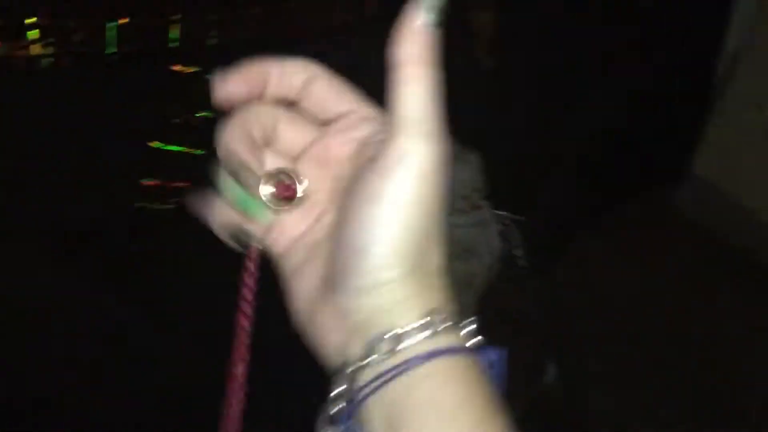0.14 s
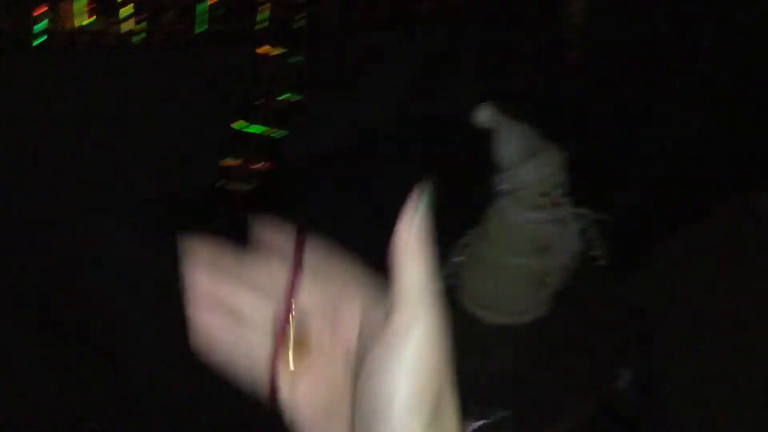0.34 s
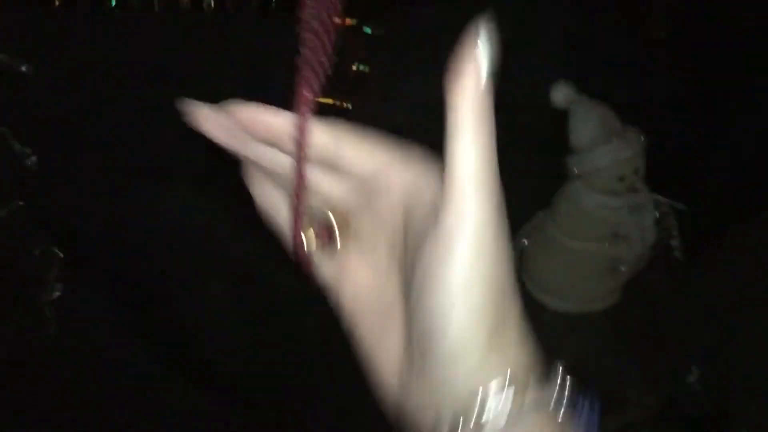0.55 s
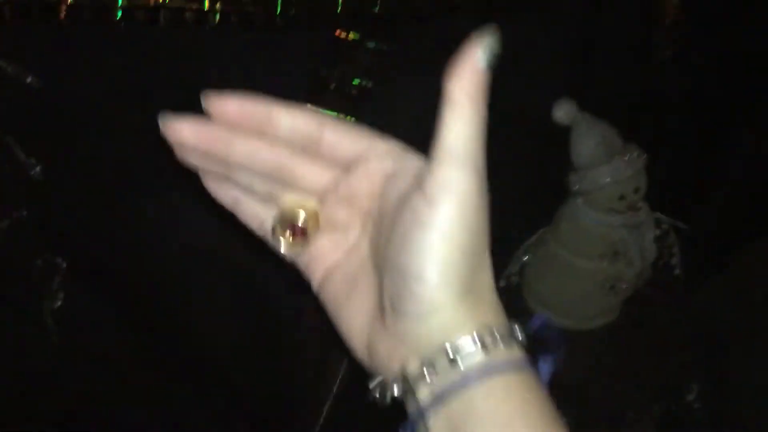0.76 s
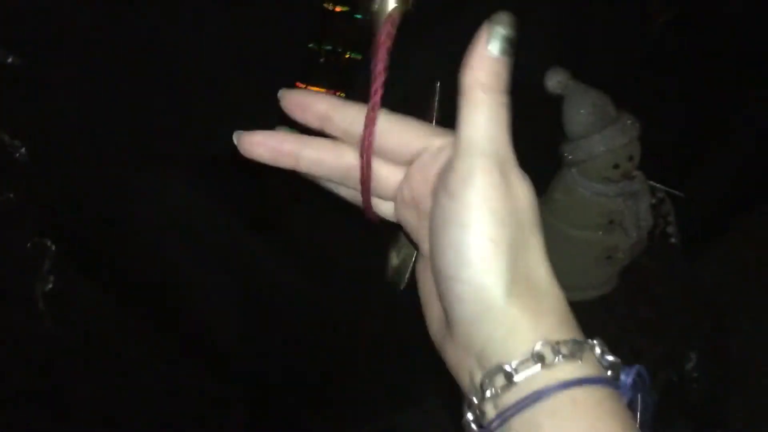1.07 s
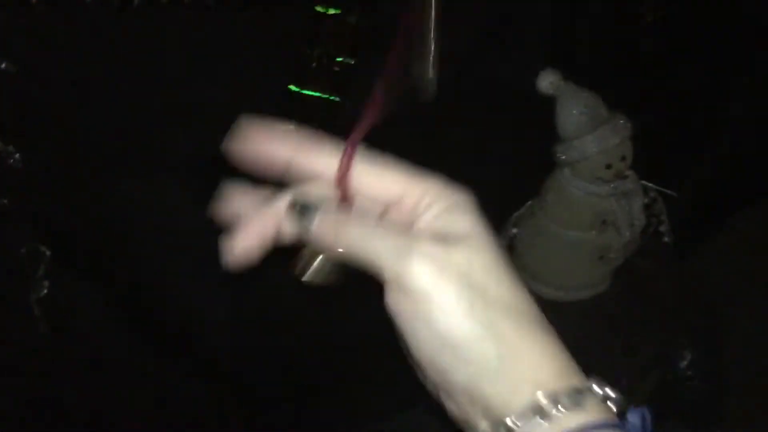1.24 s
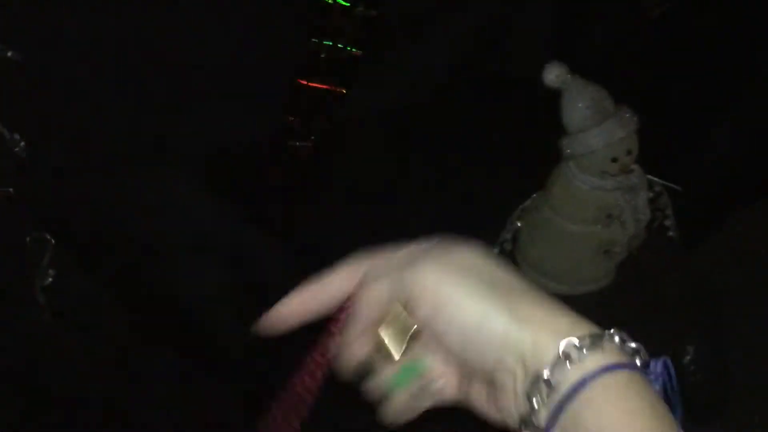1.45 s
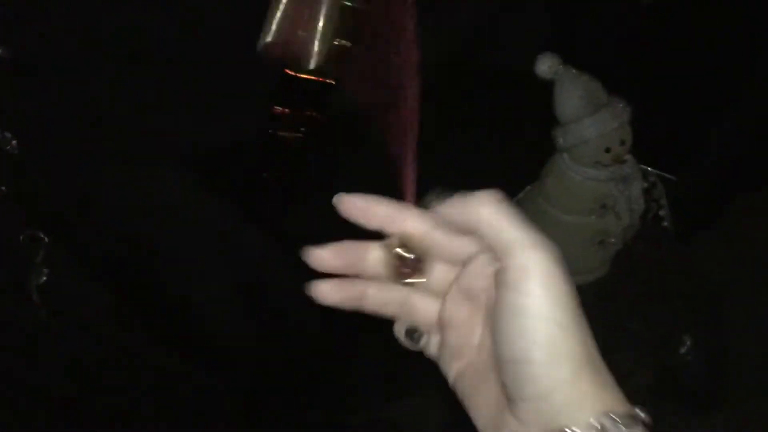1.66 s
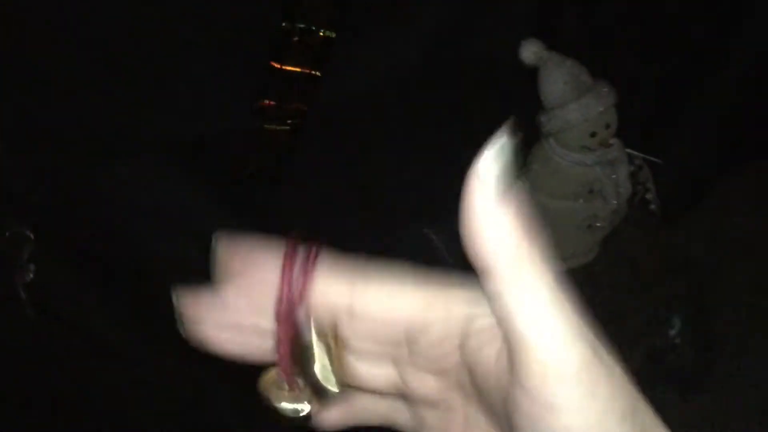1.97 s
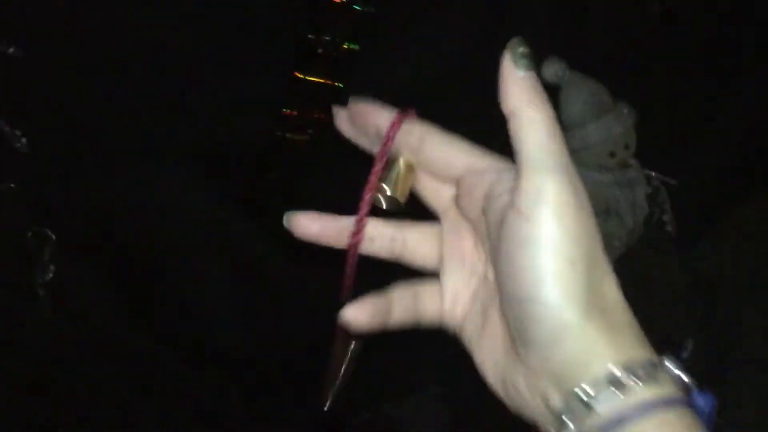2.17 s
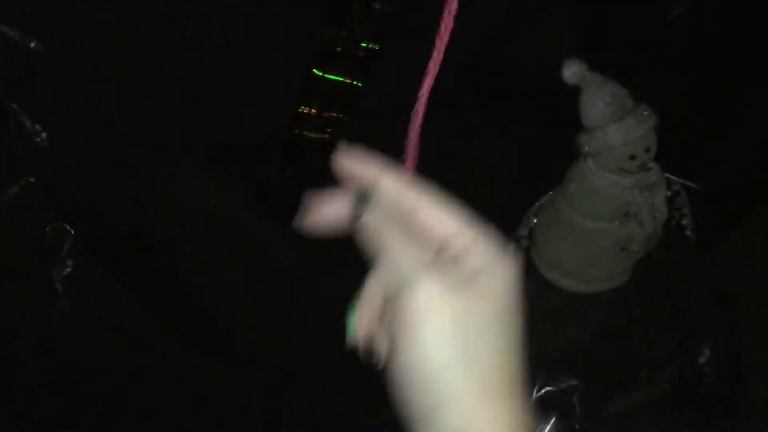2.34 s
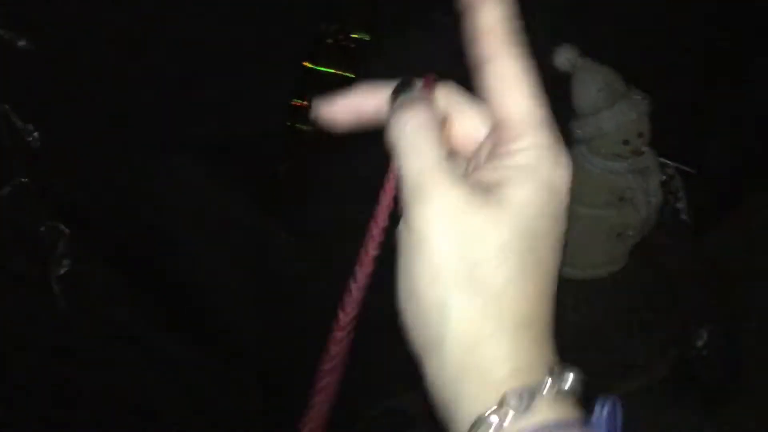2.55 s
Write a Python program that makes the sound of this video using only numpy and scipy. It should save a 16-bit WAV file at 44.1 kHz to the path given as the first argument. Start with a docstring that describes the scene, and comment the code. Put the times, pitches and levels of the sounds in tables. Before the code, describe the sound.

Small hard beads on a cord, flipped around a ringed hand, click in short uneven clusters, with one strong clack near one second and faint cord rustle; close microphone, small room, steady low fan.

```python
"""A small room, close to the microphone: small hard beads on a cord are flipped around a hand.
They click against each other and clack on finger rings in short clusters, each contact a few fast-dying modes.
Between flips the cord slides over the skin as swells of grainy filtered noise.
Beads, rings and cord get random-echo reverb; a fan rushes (shaped noise) and hums (sines) behind."""
import sys
import numpy as np
from scipy import signal
from scipy.fft import rfft, irfft
from scipy.io import wavfile
from scipy.ndimage import uniform_filter1d

SR = 44100
rng = np.random.default_rng(int(sys.argv[2]) if len(sys.argv) > 2 else 0)


def pcm_store(signal):
    """Save signal as 16-bit PCM."""
    levels = np.round(np.clip(np.atleast_2d(signal), -1, 1) * 32767)
    wavfile.write(sys.argv[1], SR, levels.astype(np.int16).T)


N = 119511
T = np.arange(N) / SR  # time axis, s

# Bead contacts, balanced around the body of the click:
# start_s, strength_db (relative), high_ring_db (against body), low_knock_db (against body)
BEAD_CONTACTS = [ (0.1443, -19, -3, -5), (0.1534, -16.5, 2, -7), (0.1582, -7, -10, -33),
                 (.1623, -25, -9, 0), (0.2672, -14.5, 7.5, -9.5), (0.2833, -24.5, 5, 6.5),
                 (.3126, -19, 7, -2), (.3162, -26, 2, -1), (.3175, -27, 6, 1), (.3227, -28, 3, -2),
                 (.3243, -19, 13, -3), (.3290, -25, 4, -3), (.5388, -13, 11, -7), (.5467, -24, 5, -1),
                 (.5547, -21, 9, -3), (.6071, -35, -14, 0), (.7123, -28, 9, 4), (.7223, -21, 11, 4),
                 (.7252, -19, 13, 3), (.7317, -21, 8, 0), (.7375, -25, 8, 0), (.7459, -30, 1, 0),
                 (0.964, -30, 14, 8), (.9814, -35, 15, 8), (1.3118, -25, 6, 2), (1.3299, -28, -1, 4),
                 (1.3336, -18, 0, 1.5), (1.7674, -33, 2, 2), (1.7793, -11, 11, 3), (1.7831, -27, 9, 1),
                 (1.7865, -31, 6, 2), (1.9691, -41, -7, -15), (2.0075, -31, 8, 0), (2.0145, -17.5, 5, -6),
                 (2.0390, -18.5, -21, -9.5), (2.0548, -27.5, 10.5, -13), (2.2160, -16.5, 2, -12),
                 (2.2267, -25, -18, -10), (2.6498, -2, -5.5, -9.5), (2.6562, -29, 8, 14),
                 (2.6709, -21.5, -6, 4.5), (2.6861, -35, -2, -1), (2.6958, -26.5, 13, 2)]
# Modes a bead rings with: pitch_hz, level_db (relative), t60_s
BEAD_MODES = np.array([(5330, -25, 0.0044), (6730, -5.5, 0.00089), (9230, 1.0, 0.002), (11400, 3, 0.0023),
              (12900, -1.5, 0.0012), (15330, 5.5, 0.0024)])
KNOCK_HZ, BODY_HZ, RING_HZ = 6780, 10500, 13100  # centres of low knock, body and high ring
MODE_SPREAD = 0.0079  # random detuning, share of pitch
BEAD_DB, BEAD_LOW_HZ = -3.5, 4700  # trim and low cut
HAND_ECHO_S, HAND_ECHO_DB = 0.0007, -16  # mean lag, level against the first touch
CHATTER_S, CHATTER_DB = 0.004, -21  # time scale, starting level against the first touch

# Heavier knocks of a bead on a finger ring: start_s, strength_db (relative)
RING_KNOCKS = [(0.9507, -0.5), (0.9598, -24)]
# Modes the finger ring sounds with: pitch_hz, level_db (relative)
RING_MODES = np.array([(3400, -20), (6700, -16), (11000, -5), (14100, -1.5), (16100, -4)])
RING_T60_S, RING_LOW_HZ = 0.0025, 2640  # decay and low cut

# Cord sliding over the hand: middle_s, half_length_s (to 1/e), level_db (rms at the middle, before
# the cuts), centre_hz
CORD_SLIDES = [(0.044, 0.045, -66, 13800), (0.117, 0.023, -57, 11700), (0.16, .1, -77, 4500),
               (0.205, .025, -71, 13000), (0.212, .02, -78, 5800), (0.6, 0.028, -69, 10800),
               (1.053, 0.053, -81, 9470), (1.06, 0.051, -75.5, 13800), (1.17, .02, -80.5, 11300),
               (1.53, .1, -85, 12500), (1.502, 0.024, -72, 13300), (1.5, 0.018, -81, 6640),
               (1.549, .01, -70, 6040), (1.555, 0.0073, -60, 10200), (1.596, 0.013, -75, 13700),
               (1.672, 0.019, -75, 14800), (1.875, 0.037, -84, 12900), (1.969, 0.0095, -70, 13500),
               (2.001, 0.015, -62, 12800), (2.045, 0.049, -83, 6200), (2.39, 0.1, -84, 4600),
               (2.67, .03, -64, 12200)]
SLIDE_WIDTH = 0.32  # bandwidth, share of the centre frequency
SLIDE_LOW_HZ = 4270  # low cut
SLIDE_GRAIN_DB, SLIDE_CATCH_DB = 2.8, 2  # spread of the fast grain and of the slower catching
SOFT_TOP_HZ = 15700  # high cut of the cord slides and the echoes

# Scattered echoes from hand and nearby things, then a short tail (levels before the body boost)
EARLY_DB, EARLY_T60_S, EARLY_GAP_S, EARLY_GRAIN_DB = -15, 0.035, 0.0016, 8
TAIL_DB, TAIL_T60_S, TAIL_GAP_S = -17.5, 0.19, 0.004
# The room returns the lower part of a click more strongly: a lowpassed copy is added
ROOM_BODY_DB, ROOM_BODY_HZ = -1, 6000

# Spectrum of the fan's rush: pitch_hz, density_db (per Hz, relative)
FAN_RUSH = [(25, -32.5), (55, -43), (85, -19), (110, -4.5), (150, 1), (205, -0.5), (275, 5.5), (340, -2),
            (520, -2), (700, -5.5), (860, -11), (1100, -16.5), (1300, -17.5), (1950, -18.5), (2500, -22.5),
            (3100, -32), (3800, -40), (4400, -52), (5400, -60.5), (8000, -61)]
# Top end of the same spectrum: pitch_hz, density_db (per Hz, relative)
FAN_TOP = [(16000, -73)]
# Narrow resonances of fan housing and room: pitch_hz, half_width_hz (to -6 dB), level_db (rms)
FAN_RESONANCES = [(236.6, 6.8, -55), (266.2, 26, -48), (478.5, 11, -63.5), (518, 19, -60.5),
                  (572, 6.7, -59.5), (679, 28, -54), (770, 23, -60), (1029.5, 14, -62), (1123, 37, -63)]
# Steady tones of the fan: pitch_hz, level_db (rms, before the waver)
FAN_HUM = [(120.1, -45.5), (152, -54.5), (1674, -74)]
FAN_DB, HUM_WAVER_DB = -42, 1.33  # rms of the rush, spread of the hum's level
FAN_HISS_HZ, FAN_DRIFT_DB = 2740, 1.9  # hiss above this drifts in level by this spread
TOP_HZ = 16500  # overall high cut


def beads():
    """Each contact rings the bead's modes, balanced by where it is hit; a near echo off the hand and faint
    chatter follow."""
    out = np.zeros(N)
    mode_hz, mode_db, t60 = BEAD_MODES.T
    sign = (-1) ** np.arange(len(mode_hz))  # neighbouring modes start in opposite directions
    for start, strength_db, ring_db, knock_db in BEAD_CONTACTS:
        balance_db = np.interp(mode_hz, [KNOCK_HZ, BODY_HZ, RING_HZ], [knock_db, 0, ring_db])
        gain = sign * amp(BEAD_DB + strength_db + mode_db + balance_db)
        # a near echo off the hand follows at once, then the bead chatters faintly on the cord
        touches = [(0, 0), (HAND_ECHO_S * (0.5 + rng.random()), HAND_ECHO_DB)]
        for lag in np.cumsum(rng.random(size=5)):
            touches.append((CHATTER_S * lag, CHATTER_DB - 2 * lag))
        for lag_s, touch_db in touches:
            detune = 1 + MODE_SPREAD * rng.standard_normal(len(mode_hz))
            click = strike(mode_hz * detune, gain * amp(touch_db), t60)
            add(out, start + lag_s, click)
    return highpass(out, BEAD_LOW_HZ)


def finger_ring():
    """A bead lands on a ring: a lower, hollower clack from the ring's own modes."""
    out = np.zeros(N)
    mode_hz, mode_db = RING_MODES.T
    for start, strength_db in RING_KNOCKS:
        add(out, start, strike(mode_hz, amp(strength_db + mode_db), RING_T60_S))
    return highpass(out, RING_LOW_HZ)


def strike(hz, gain, t60):
    """Quickly dying modes set off by one hard contact; at equal gain, faster decays start louder."""
    t = T[:SR // 100, None]
    decay = np.log(1000) / t60
    modes = np.exp(-decay * t) * np.sin(2 * np.pi * hz * t)
    return np.sum(gain * 2 * decay / SR * modes, axis=1)


def cord():
    """Each slide is a swell of grainy friction hiss that catches and slips unevenly."""
    out = np.zeros(N)
    f = np.fft.rfftfreq(N, 1 / SR)
    grip = unit(amp(SLIDE_GRAIN_DB * walk(800) + SLIDE_CATCH_DB * walk(90)))
    for middle, half, db, hz in CORD_SLIDES:
        band = rfft(rng.standard_normal(N) * grip) / (1 + 2j * (f / hz - 1) / SLIDE_WIDTH) ** 2
        swell = np.exp(-((T - middle) / half) ** 2)
        out += amp(db) * unit(irfft(band, N)) * swell
    return cut_top(highpass(out, SLIDE_LOW_HZ))


def room_response():
    """Early scattered echoes plus a short tail, with the lower part reinforced and a high cut."""
    early = echoes(EARLY_DB, EARLY_T60_S, EARLY_GAP_S, EARLY_GRAIN_DB)
    tail = echoes(TAIL_DB, TAIL_T60_S, TAIL_GAP_S, 0)
    room = early + tail
    body = signal.sosfilt(signal.butter(1, ROOM_BODY_HZ, fs=SR, output="sos"), room)
    return cut_top(room + amp(ROOM_BODY_DB) * body)


def echoes(db, t60, gap_s, grain_db):
    """A fading train of random reflections; more grain makes single ones stand out."""
    t = T[:SR // 2]
    train = rng.standard_normal(len(t)) * amp(grain_db * rng.standard_normal(len(t)))
    train = train * np.exp(-np.log(1000) * t / t60) * (t > gap_s)
    return amp(db) * train / np.sqrt(np.sum(train ** 2))  # level set by total energy


def fan():
    """Rush of air with drifting hiss and narrow resonances, under a slightly wavering motor hum."""
    f = np.fft.rfftfreq(N, 1 / SR)
    out = amp(FAN_DB) * coloured(FAN_RUSH + FAN_TOP)
    hiss = irfft(rfft(out) * (f > FAN_HISS_HZ), N)
    out += hiss * (amp(FAN_DRIFT_DB * walk(5.6)) - 1)
    for hz, half_width, db in FAN_RESONANCES:
        band = rfft(rng.standard_normal(N)) / (1 + 1j * (f - hz) / half_width) ** 2
        out += amp(db) * unit(irfft(band, N))
    for hz, db in FAN_HUM:
        level = np.sqrt(2) * amp(db + HUM_WAVER_DB * walk(1.4))  # rms to peak
        out += level * np.sin(2 * np.pi * (hz * T + rng.random()))
    return out


def coloured(points):
    """Noise of rms 1 with a spectrum through (Hz, dB) points, joined on a log-frequency scale."""
    hz, db = np.array(points).T
    f = np.maximum(np.fft.rfftfreq(N, 1 / SR), 1)
    shape = amp(np.interp(np.log(f), np.log(hz), db))
    return unit(irfft(rfft(rng.standard_normal(N)) * shape, N))


def walk(rate):
    """Smoothed random movement of rms 1 that takes a new value rate times a second."""
    hold = max(int(SR / rate), 1)
    steps = rng.standard_normal(N)[np.arange(N) // hold]
    return unit(uniform_filter1d(steps, hold))


def cut_top(x):
    """Steep lowpass at SOFT_TOP_HZ, used on the cord slides and the echoes."""
    return signal.sosfilt(signal.ellip(8, 0.2, 60, SOFT_TOP_HZ, fs=SR, output="sos"), x)


def highpass(x, hz):
    """Take away what lies below hz, steeply."""
    return signal.sosfilt(signal.butter(8, hz, "high", fs=SR, output="sos"), x)


def add(out, start_s, sound):
    """Mix a sound in at a given time."""
    i = int(start_s * SR)
    out[i:i + len(sound)] += sound[:max(N - i, 0)]


def amp(db):
    """Decibels to gain."""
    return 10 ** (np.asarray(db) / 20)


def unit(x):
    """Scale to rms 1."""
    return x / np.sqrt(np.mean(x ** 2))


def scene():
    """Beads, ring and cord with their echoes, over the fan."""
    near = beads() + finger_ring() + cord()
    reflected = signal.fftconvolve(near, room_response())[:N]
    return (near + reflected + fan())[None]


def record(dry):
    """Short 4 ms fade-in so that the sound starts without a click, then a steep lowpass at TOP_HZ."""
    fade_in = np.minimum(T / 0.004, 1)
    return signal.sosfilt(signal.ellip(8, 0.2, 70, TOP_HZ, fs=SR, output="sos"), dry * fade_in)


dry = scene()
out = record(dry)
pcm_store(out)
```